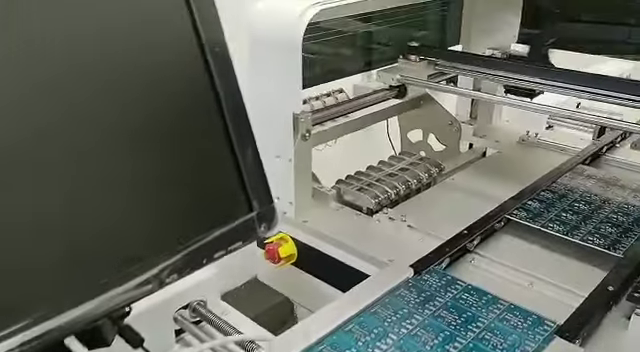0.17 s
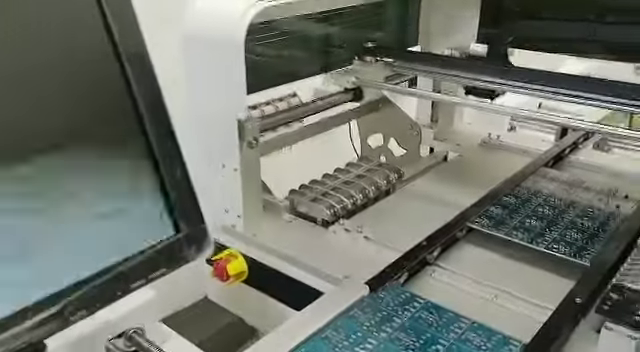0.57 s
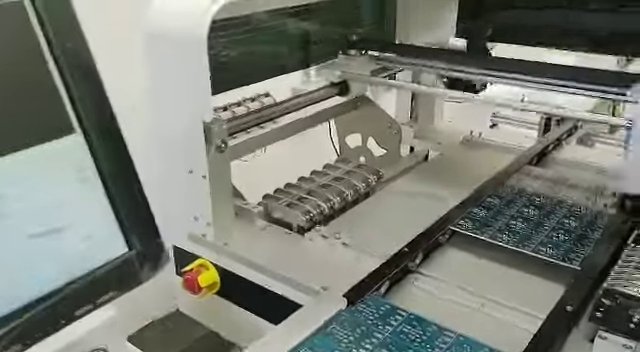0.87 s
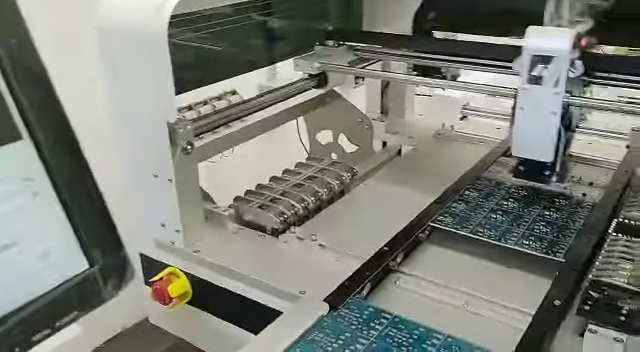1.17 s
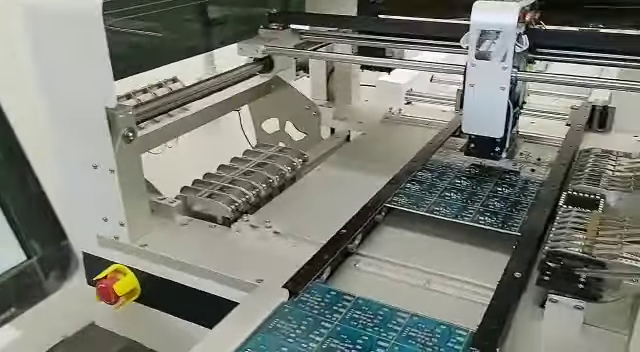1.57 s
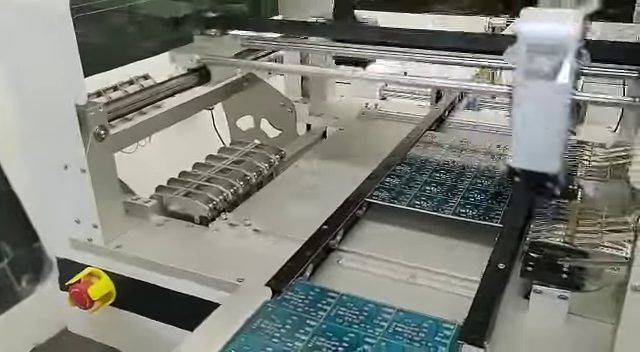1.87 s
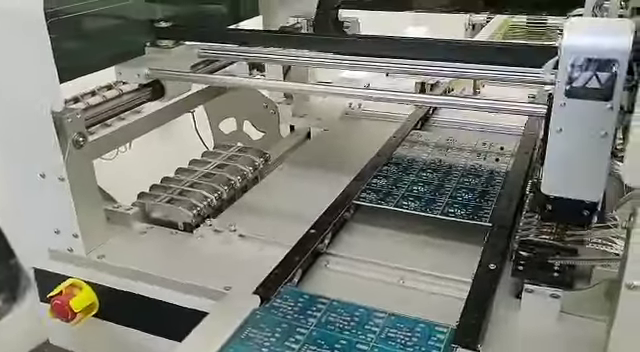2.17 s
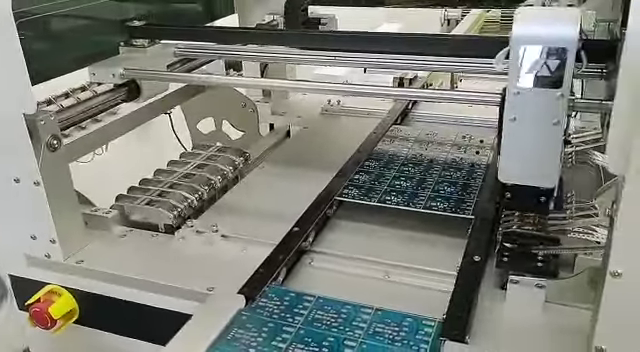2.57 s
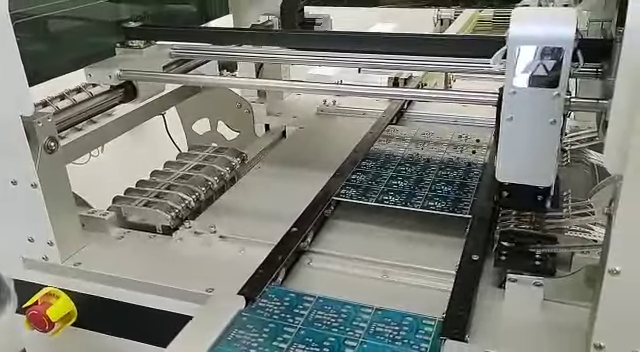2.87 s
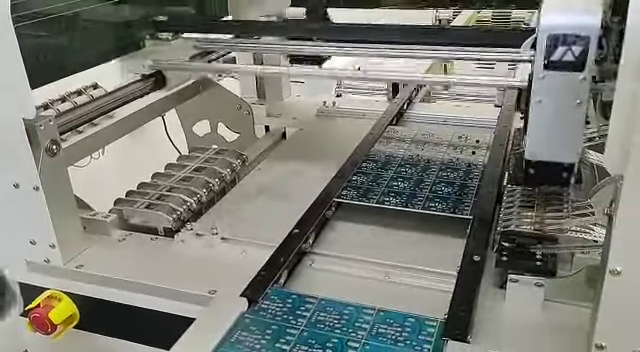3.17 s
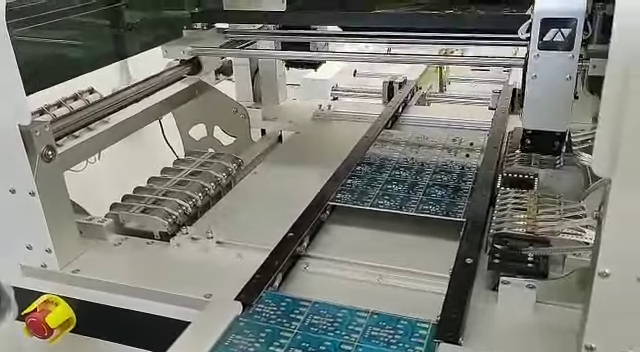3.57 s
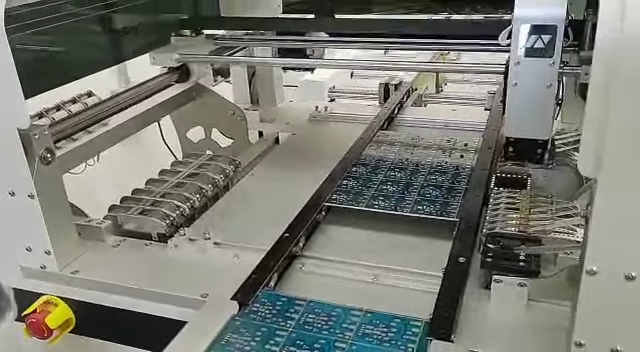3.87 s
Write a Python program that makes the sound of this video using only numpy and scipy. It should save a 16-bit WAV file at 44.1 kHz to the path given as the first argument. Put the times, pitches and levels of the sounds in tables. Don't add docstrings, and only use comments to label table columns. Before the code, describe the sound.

Stepper motor whines up and down in bursts, gears clatter midway, over pump hum and airy hiss.

```python
import sys
import numpy as np
from scipy import signal
from scipy.fft import rfft, irfft, next_fast_len
from scipy.io import wavfile
from scipy.ndimage import map_coordinates

SR = 44100
rng = np.random.default_rng(int(sys.argv[2]) if len(sys.argv) > 2 else 0)


def wrap_up_sound(samples):
    columns = np.atleast_2d(samples).T
    tamed = np.clip(columns, -1, 1)
    steps = np.round(tamed * 32767).astype(np.int16)
    wavfile.write(sys.argv[1], SR, steps)


def natural_amplitude(level_db):
    exponent = np.asarray(level_db, float) / 20
    return 10 ** exponent


N = 176400
TIME = np.arange(N) / SR

# (moment of top speed [s], top step rate [Hz])
SPEEDS = [(.058, 1349), (.993, 1155), (1.957, 1747), (3.331, 1822), (4.12, 1839)]
START_RATES = [308, 385, 290, 308, 308]
# (second axis [dB], low rail noise [dB], high rail noise [dB], frame shake [dB])
MOVE_LEVELS = [(-42.5, -46, -50, -47), (-42, -43, -47.5, -53), (-43.5, -43, -45, -49),
               (-38.5, -46, -45, -49), (-40.5, -40.5, -34.5, -45)]
# (frequency [Hz], width [Hz], level [dB])
FEEDER_CASE = [(1301, 60, 1), (1498, 180, -3.5), (2600, 260, -12), (3490, 180, -17.5), (4050, 78, -27.5),
               (5240, 130, -27.5), (6370, 100, -30.5)]
RAMP_HZ_PER_S = 5900


def unit(x):
    return x / np.sqrt(np.mean(x ** 2) + 1e-20)


def along(points, hz):
    f, v = np.transpose(points)
    return np.interp(np.log(hz + 1), np.log(f + 1), v)


def wobble(rate):
    knots = rng.standard_normal(int(N * rate / SR) + 4)
    return map_coordinates(knots, [np.arange(N) * rate / SR])


def filtered(x, response):
    m = next_fast_len(N + SR)
    return irfft(rfft(x, m) * response(np.fft.rfftfreq(m, 1 / SR)), m)[..., :N]


def body(peaks):
    def response(f):
        total = 0
        for k, (hz, width, db) in enumerate(peaks):
            damping = 1j * f * width
            total = total + (-1) ** k * natural_amplitude(db) * damping / (hz * hz - f * f + damping)
        return total
    return response


def narrow(peaks):
    return lambda f: body(peaks)(f) ** 2


def shaped(points):
    return lambda f: natural_amplitude(along(points, f))


def noise(response, grain_db=0):
    return unit(filtered(rng.standard_normal(N) * natural_amplitude(grain_db * wobble(90)), response))


def linger(env, t60):
    pole = natural_amplitude(-60 / (t60 * SR))
    return signal.lfilter([1 - pole], [1, -pole], env, zi=[pole * env[0]])[0]


def span(start, length, fade_s):
    return np.clip(np.minimum(TIME - start, start + length - TIME) / fade_s, 0, 1)


def room(x):
    # (frequency [Hz], t60 [s])
    decay = [(200, 0.45), (1500, 1), (2800, 0.91), (3800, 0.27), (8000, 0.25)]
    hz, t, z = signal.stft(rng.standard_normal(SR), SR, nperseg=256)
    fading = z * natural_amplitude(-60 * t / along(decay, hz)[:, None])
    tail = signal.istft(fading, SR, nperseg=256)[1]
    return signal.fftconvolve(x, tail / np.linalg.norm(tail))[:N]


def workshop():
    # (time [s], level [dB])
    approach = [(0, 1.5), (.7, -0.5), (1.598, 0), (2.4, 3), (3, 5.5), (3.749, 7.5), (4, 12)]
    # (frequency [Hz], density [dB per Hz])
    air_colour = [(26, -44), (45, -14), (256, -1.5), (379, -14), (652, -15.5), (696, -13), (3190, -31),
                  (3710, -35.5), (8110, -47), (10500, -73), (17800, -120)]
    # (frequency [Hz], width [Hz], level [dB])
    pump_lines = [(64.6, 4.4, -5), (103.2, 5.8, -5), (145.4, 10, -1.5), (185.9, 16, -0.5), (235.9, 8.7, 0),
                  (312, 41, -10)]
    leak_hz, leak_grows = 3500, 1.58
    s, db = np.transpose(approach)
    near_db = np.interp(TIME, s, db)
    air = natural_amplitude(-53.5 + 0.33 * wobble(5.89)) * noise(shaped(air_colour), grain_db=0.5)
    fan = filtered(air, lambda f: 1 / (1 + (f / leak_hz) ** 4))
    leak = air - fan
    hum = natural_amplitude(-51.5) * noise(narrow(pump_lines))
    return natural_amplitude(near_db) * fan + natural_amplitude(leak_grows * near_db) * leak + hum


def nozzle():
    # (start [s], rise time [s], level [dB])
    openings = [
        (3.659, 0.034, -52),
        (3.838, 0.03, -47.5),
    ]
    # (frequency [Hz], density [dB per Hz])
    suction_colour = [(470, -34), (800, -40), (1130, -2), (1640, 0.5), (5950, -22), (8110, -29),
                      (10500, -76), (17800, -120)]
    flow = sum(natural_amplitude(db) * np.clip((TIME - s) / rise, 0, 1) for s, rise, db in openings)
    return flow * noise(shaped(suction_colour))


def valves():
    # (time [s], peak [dB], length [s], colour [Hz])
    puffs = [(1.108, -44, .012, 600), (1.5245, -61, .008, 7200), (1.5245, -63, .008, 4500),
             (1.525, -50, .008, 250), (1.644, -59, .005, 3000), (1.682, -60, .008, 2900),
             (1.497, -65, .006, 2900), (1.736, -59, .02, 4400), (2.282, -60, .007, 4400),
             (2.885, -61, .008, 6800), (3.662, -65, .012, 6500)]
    out = np.zeros(N)
    for s, db, length, hz in puffs:
        u = np.clip((TIME - s) / length, 0, None)
        out += natural_amplitude(db) * (u > 0) * np.exp(-u ** 2) * noise(narrow([(hz, .6 * hz, 0)]))
    return out


def feeder():
    # (start [s], length [s], level [dB], time of a knock [s])
    feeds = [
        (2.43, 0.36, -45, 2.749),
        (3.038, 0.37, -40.5, 2.8),
    ]
    turn_beat = [(1, 0.27, -0.48), (2, 0.21, 0.62), (3, 0.44, -0.32)]
    # (frequency [Hz], density [dB per Hz])
    hiss_colour = [(180, -46.5), (300, -3.5), (1110, -8.5), (1450, 2.5), (1750, -47.5), (2730, -15),
                   (8110, -34.5), (10500, -76.5), (17800, -120)]
    turn_hz = 41.55
    rise_s, fall_s, idle_s, idle_db = 0.039, 0.11, 2.14, 1
    gear_db, hiss_db, coast_hiss_db, rattle_db = -5, -6.5, 4, -18
    out = np.zeros(N)
    for s, length, db, knock_s in feeds:
        run = np.clip((TIME - s) / 0.012, 0, 1) * (TIME < s + length)
        run = run * (1 - .5 * np.exp(-np.abs(TIME - s) / rise_s))
        level = np.maximum(run, linger(run, fall_s)) + natural_amplitude(idle_db) * linger(run, idle_s)
        turn = (TIME - knock_s) * turn_hz
        since_knock_s = (turn % 1) / turn_hz

        beat = np.abs(1 + sum(depth * np.cos(2 * np.pi * k * turn + phase) for k, depth, phase in turn_beat))
        gears = beat * natural_amplitude(0.67 * wobble(40)) * rng.standard_normal(N)
        case = unit(filtered(gears, body(FEEDER_CASE)))

        knocks = 1 + 1.3 * run * np.exp(-since_knock_s / .005) * natural_amplitude(2.5 * wobble(40))
        hiss = unit(filtered(knocks * rng.standard_normal(N), shaped(hiss_colour)))
        coast = 1 + (natural_amplitude(coast_hiss_db) - 1) * (TIME > s + length)

        tick = run * np.exp(-since_knock_s / .005) * natural_amplitude(2.7 * wobble(46))
        rattle = tick * noise(narrow([(6000, 2500, 0)]))

        running = level * (natural_amplitude(gear_db) * case + natural_amplitude(hiss_db) * coast * hiss)
        out += natural_amplitude(db) * (running + natural_amplitude(rattle_db) * rattle)
    return out


def teeth():
    # (time [s], peak [dB])
    strikes = [(2.4199, -49), (2.4363, -42.5), (2.4533, -35.5), (2.4847, -34), (2.5022, -30.5),
               (2.5341, -29.5), (2.5501, -32.5), (2.571, -34.5), (2.6054, -31.5), (2.6214, -32.5),
               (2.6533, -34.5), (2.6688, -30.5), (2.6937, -42), (2.7197, -29.5), (2.7496, -27),
               (2.7745, -32), (2.7985, -36.5), (2.8294, -39.5), (3.0463, -44), (3.0593, -32),
               (3.0832, -31.5), (3.1162, -34), (3.1381, -30.5), (3.1626, -33), (3.1805, -33.5),
               (3.2129, -25), (3.2364, -28.5), (3.2524, -23), (3.2773, -19), (3.3087, -24), (3.3332, -28),
               (3.3746, -25), (3.4045, -28), (3.4808, -29)]
    contact_s, ring_db = 0.0027, -2.5
    push = np.zeros(N)
    for s, db in strikes:
        push[round((s - contact_s / 2) * SR)] = natural_amplitude(db + ring_db)
    u = np.arange(400) / SR / contact_s
    touch = u * np.exp(-u) * np.sin(2 * np.pi * FEEDER_CASE[1][0] * u * contact_s)
    ring = filtered(np.pad(touch, (0, N - len(u))), body(FEEDER_CASE))[:SR // 10]
    return signal.fftconvolve(push, ring / np.abs(ring).max())[:N]


def stops():
    # (start [s], length [s], frequency [Hz], width [Hz])
    parts = [(1.11, .12, 1010, 120), (1.0, .4, 107, 12), (1.5, .2, 96, 12), (3.55, .13, 250, 30),
             (1.22, .25, 800, 700), (1.99, .09, 1500, 70), (3.515, .04, 430, 60), (1.97, .08, 1660, 60),
             (.04, .2, 1270, 120), (2.075, .06, 1910, 60), (1.18, .05, 1005, 40), (3.45, .04, 1030, 60),
             (.945, .09, 1900, 80), (2.03, .07, 1350, 250), (1.07, .1, 290, 50), (.04, .06, 1300, 40)]
    part_levels = [-45.5, -59.5, -67, -41, -55.5, -47, -36, -46, -52, -48, -46, -48, -60, -41, -42, -51]
    out = np.zeros(N)
    for (s, length, hz, width), db in zip(parts, part_levels):
        out += natural_amplitude(db) * span(s, length, 0.016) * noise(narrow([(hz, width, 0)]))
    return out


def swings():
    # (start [s], length [s], frequency [Hz], level [dB], t60 [s])
    kicks = [(0.212, 0.21, 236, -32.5, 1.04), (3.4, 0.076, 246, -44, 1.4), (3.3, 0.15, 241, -34.5, 3),
             (1.7, 0.25, 240, -42, 3.3), (1.186, .23, 107, -50, 5)]
    out = np.zeros(N)
    for s, length, hz, db, t60 in kicks:
        fade_db = -60 * np.clip(TIME - s, 0, None) / t60
        level = natural_amplitude(db + fade_db + 1.9 * wobble(27)) * span(s, length, 0.013)
        out += level * np.sin(2 * np.pi * hz * TIME + .4 * wobble(30))
    return out


def driver_whistle():
    return natural_amplitude(-81) * span(1.78, .65, .1) * noise(narrow([(7450, 500, 0)]), grain_db=2.0)


def head_speed(s, top_hz, start_hz):
    rate = np.clip(top_hz - RAMP_HZ_PER_S * np.sqrt((TIME - s) ** 2 + .013 ** 2), 0, None)
    on = np.clip(np.where(TIME < s, rate - start_hz, rate) / 80, 0, 1)
    return rate, on


def rails():
    # (frequency [Hz], width [Hz], level [dB])
    frame_modes = [(490, 87, -4.5), (1080, 84, -13), (1340, 110, -1.5), (1880, 72, 9), (2310, 480, 2),
                   (2950, 210, -7.5)]
    # (frequency [Hz], width [Hz], level [dB])
    boom_modes = [(240, 34, 0), (298, 55, -1)]
    # (frequency [Hz], density [dB per Hz])
    rail_colour = [(71, -43), (120, -14), (239, -9.5), (751, -11.5), (1490, -12.5), (2770, -19),
                   (3730, -27.5), (7430, -42), (8110, -67), (10500, -93), (17800, -120)]
    split_hz, hiss_hz = 820, 3150
    low, high, shake = np.zeros((3, N))
    for (s, top_hz), start_hz, (_, low_db, high_db, shake_db) in zip(SPEEDS, START_RATES, MOVE_LEVELS):
        rate, on = head_speed(s, top_hz, start_hz)
        pace = np.where(TIME < s, (rate - start_hz) / (top_hz - start_hz), rate / top_hz)
        pace = np.clip(pace, 0, 1)
        low += natural_amplitude(low_db) * on * pace ** 0.15
        high += natural_amplitude(high_db) * on * pace ** 0.66
        since_start = np.clip(TIME - s + (top_hz - start_hz) / RAMP_HZ_PER_S, 0, None)
        shake += natural_amplitude(shake_db + 8.5 * np.exp(-(since_start / .12) ** 2)) * on

    def colour(f):
        return shaped(rail_colour)(f) * (1 + 0.5 * np.abs(body(frame_modes)(f)))

    def bright_colour(f):
        return colour(f) / (1 + (split_hz / (f + 1)) ** 2) / (1 + (f / hiss_hz) ** 8)

    dull = noise(lambda f: colour(f) / (1 + (f / split_hz) ** 2), grain_db=3.5)
    bright = noise(bright_colour, grain_db=3.0)
    hiss = natural_amplitude(-16) * noise(lambda f: colour(f) / (1 + (hiss_hz / (f + 1)) ** 8))
    boom = noise(narrow(boom_modes), grain_db=-0.5) * natural_amplitude(0.83 * wobble(22))
    rolling = linger(low, 0.23) * dull + linger(high, 0.25) * bright + linger(high, 0.2) * hiss
    return rolling + linger(shake, 0.093) * boom


def step_tones():
    tone_levels = [-43, -46, -44, -43, -41]
    octave_levels = [-4.5, -3, -3.5, -2.5, -4]
    # (frequency [Hz], gain [dB])
    mount = [(600, -10), (1000, 0), (1180, -4), (1550, 4), (1950, 5), (2500, -2), (2950, -4), (3300, -20)]
    second_mount = [(170, -14), (240, 2), (300, 4), (370, -4), (440, -2), (550, -14), (1050, -7),
                    (1300, -12)]
    # (frequency [Hz], width [Hz], level [dB])
    panels = [(992, 14, -4), (1458, 17, 11), (1681, 14, -7.5), (1900, 38, 4.5), (2200, 12, -4.5),
              (2520, 21, 3.5), (2740, 25, -7)]
    tone, second = np.zeros((2, N))
    moves = zip(SPEEDS, START_RATES, MOVE_LEVELS, tone_levels, octave_levels)
    for (s, top_hz), start_hz, (second_db, *_), tone_db, octave_db in moves:
        rate, on = head_speed(s, top_hz, start_hz)
        turn = 2 * np.pi * np.cumsum(rate * (1 + .012 * wobble(120))) / SR
        braking = np.tanh((TIME - s) / .03)

        rotor = 1 / np.sqrt(1 + (880 / (rate + 1)) ** 16)
        octave_db = octave_db - 10 * np.log10(1 + (900 / (rate + 1)) ** 24)
        multiples = np.zeros(N)
        for k, db in [(1, 0), (2, octave_db), (3, -14)]:
            multiples += natural_amplitude(db + 4.5 * wobble(60)) * np.sin(k * turn)
        tone += natural_amplitude(tone_db + 2.5 * braking) * on * rotor * multiples

        second_level = natural_amplitude(second_db + 2 * braking + 5 * wobble(45)) * on
        second += second_level * np.sin(.66 * turn + 1.5 * wobble(60))
    sung = filtered(tone, lambda f: shaped(mount)(f) * (1 + body(panels)(f)))
    return sung + filtered(second, shaped(second_mount))


def scene():
    near = nozzle() + valves() + feeder() + teeth()
    rough = rails() + driver_whistle()
    tone = step_tones()
    echo = room(natural_amplitude(-5) * tone + natural_amplitude(-9) * near + natural_amplitude(-5.5) * rough)
    return (tone + near + rough + stops() + swings() + echo + workshop())[None]


def top_cut(x):
    return signal.sosfilt(signal.butter(12, 8260, fs=SR, output="sos"), x)


def record(dry):
    def microphone(f):
        upper_edge = 1 / (1 + (f / 7920) ** 35)
        return upper_edge / (1 + (50 / (f + 1)) ** 4)
    return top_cut(filtered(dry, microphone))


dry = scene()
out = record(dry)
wrap_up_sound(out)
```